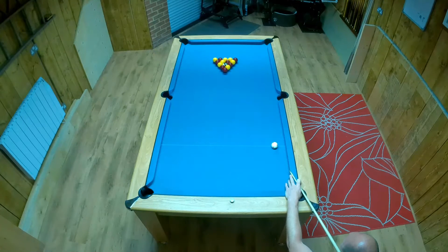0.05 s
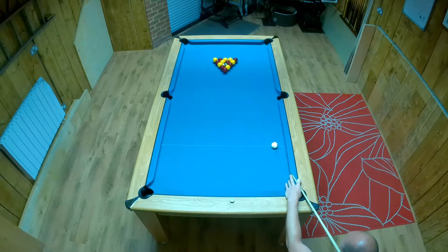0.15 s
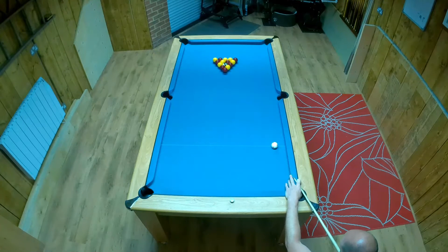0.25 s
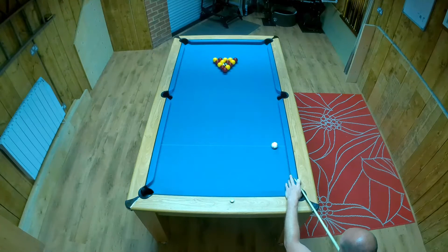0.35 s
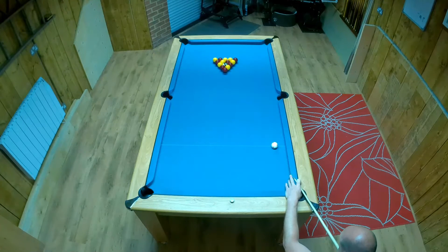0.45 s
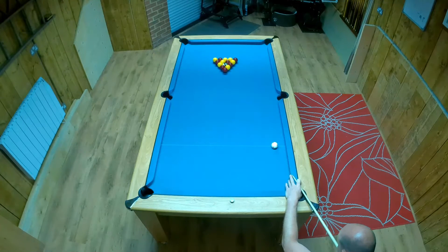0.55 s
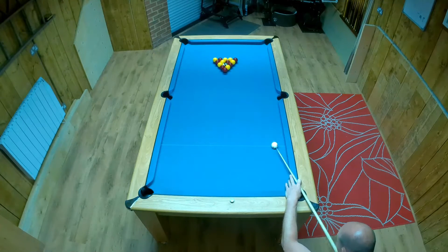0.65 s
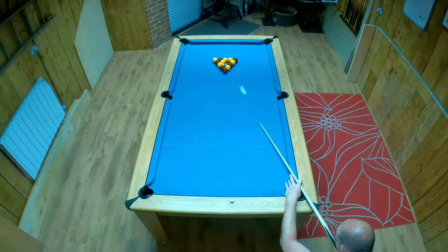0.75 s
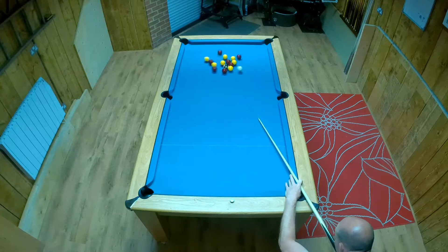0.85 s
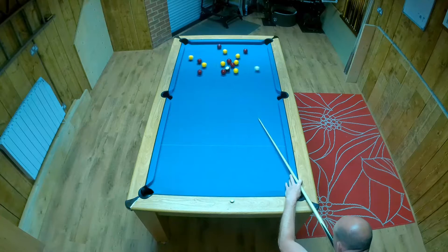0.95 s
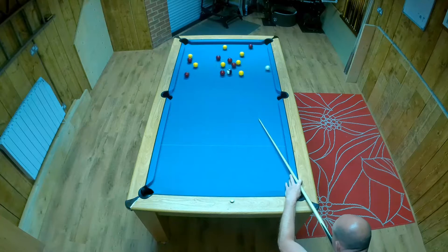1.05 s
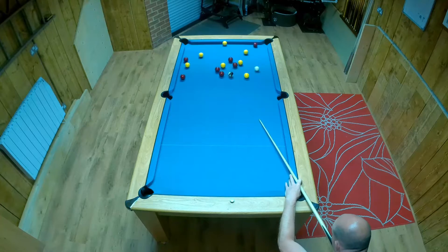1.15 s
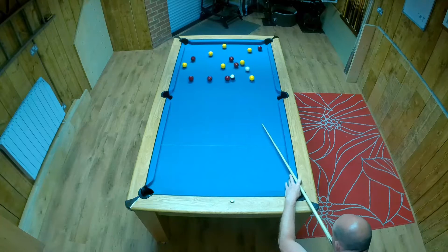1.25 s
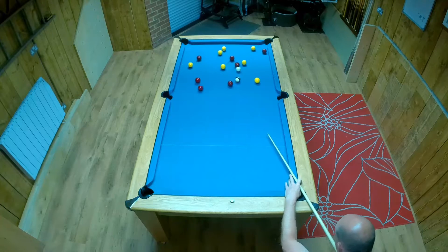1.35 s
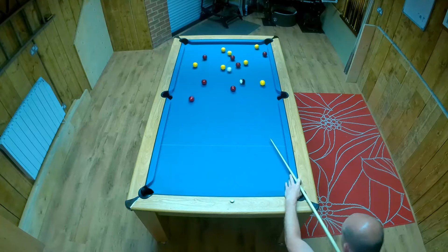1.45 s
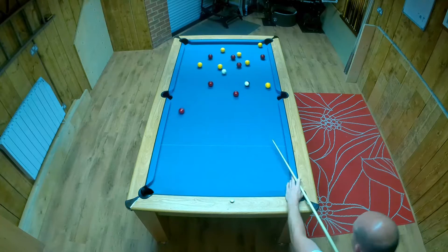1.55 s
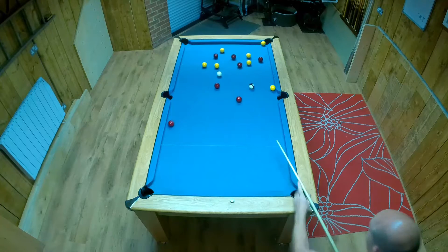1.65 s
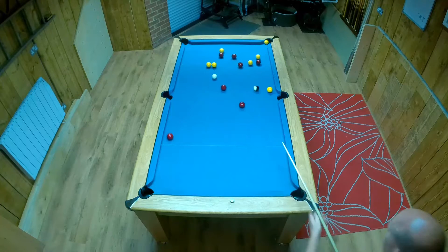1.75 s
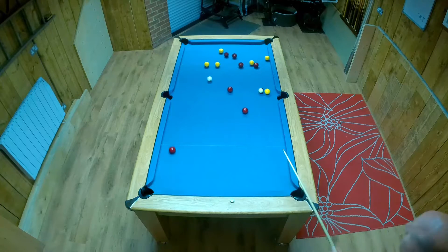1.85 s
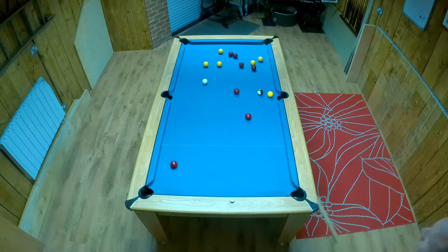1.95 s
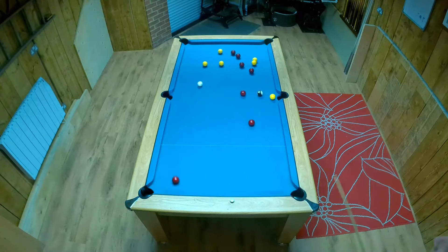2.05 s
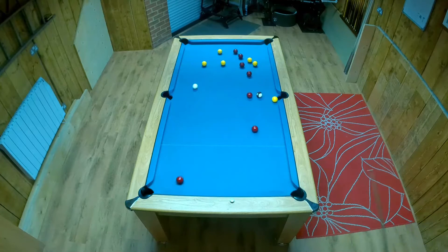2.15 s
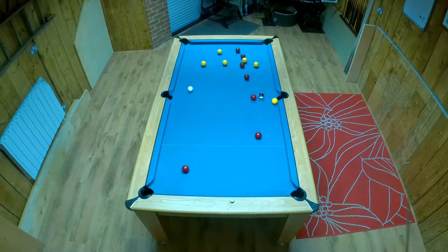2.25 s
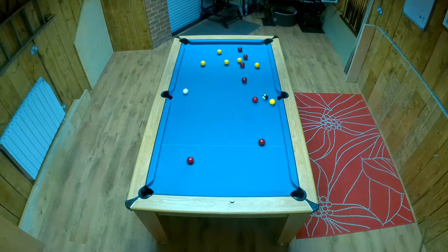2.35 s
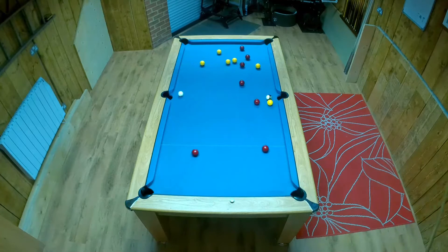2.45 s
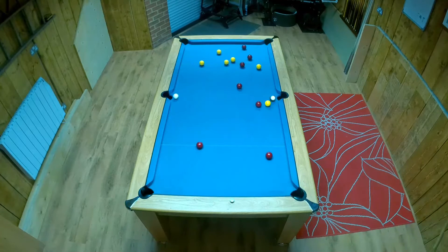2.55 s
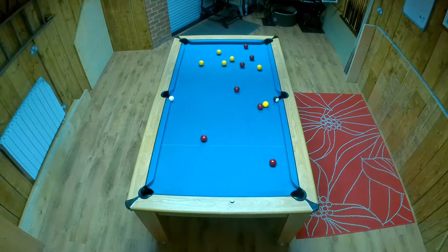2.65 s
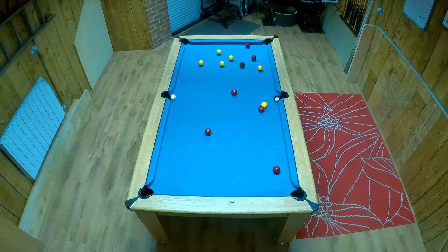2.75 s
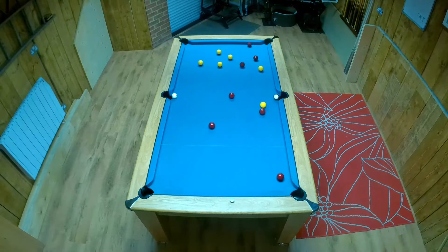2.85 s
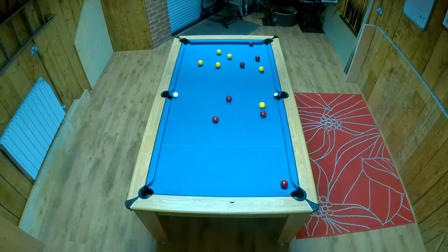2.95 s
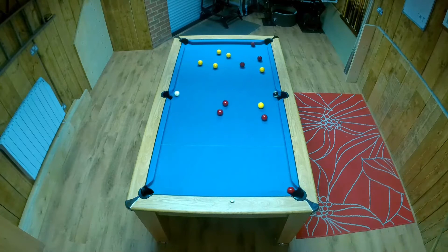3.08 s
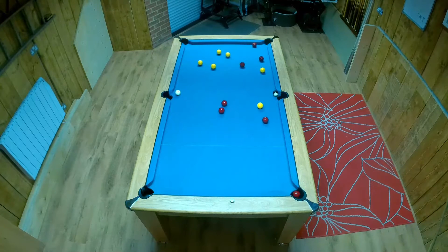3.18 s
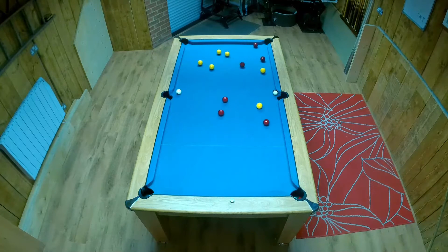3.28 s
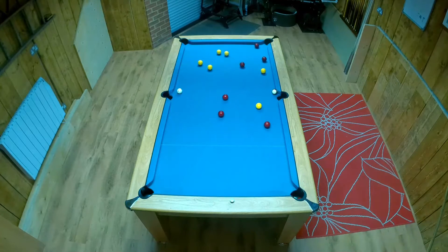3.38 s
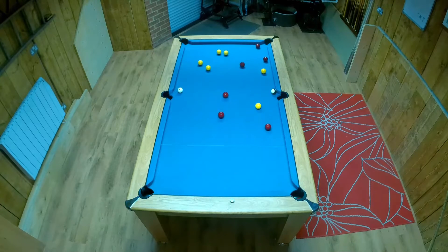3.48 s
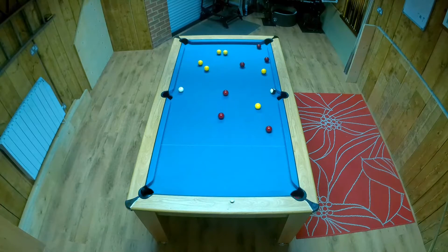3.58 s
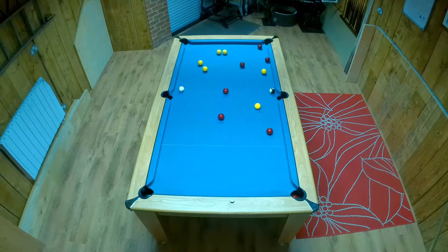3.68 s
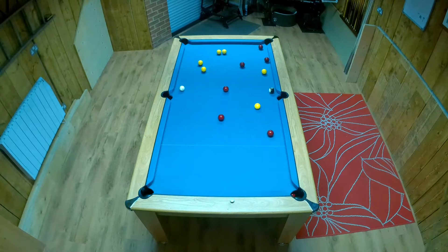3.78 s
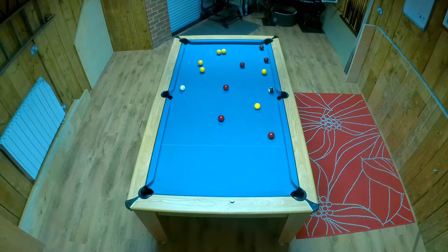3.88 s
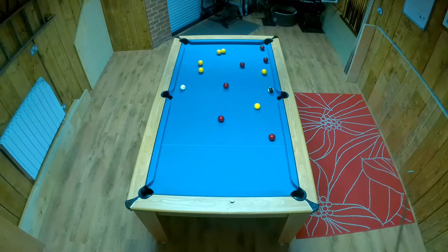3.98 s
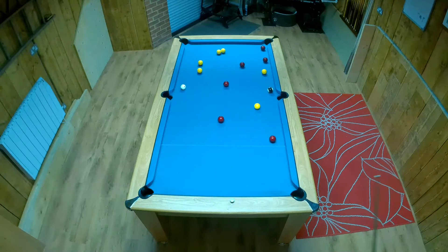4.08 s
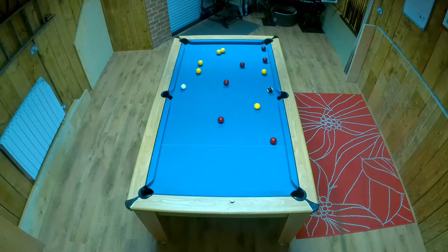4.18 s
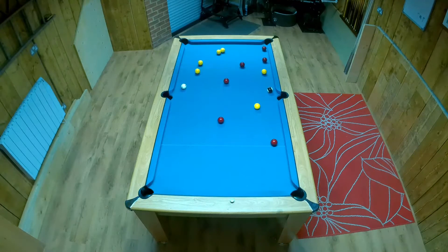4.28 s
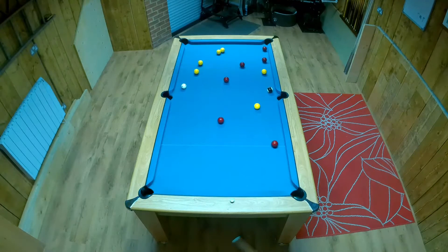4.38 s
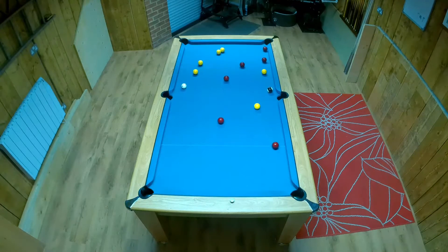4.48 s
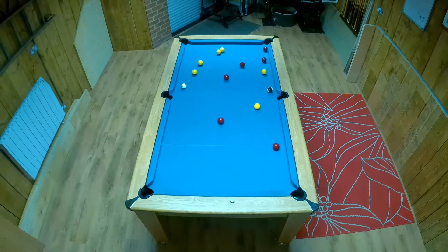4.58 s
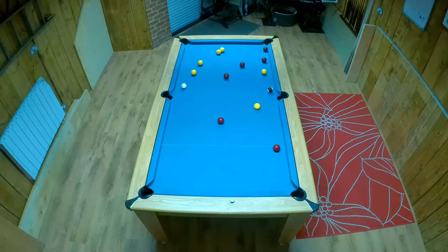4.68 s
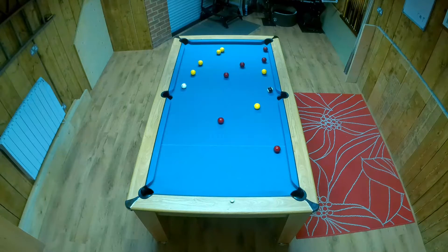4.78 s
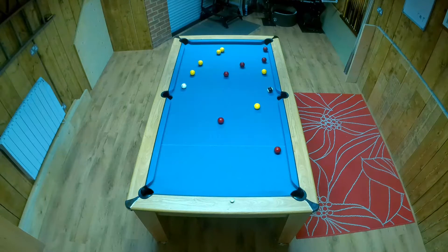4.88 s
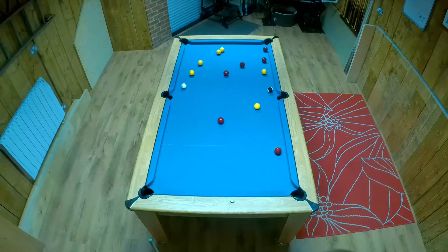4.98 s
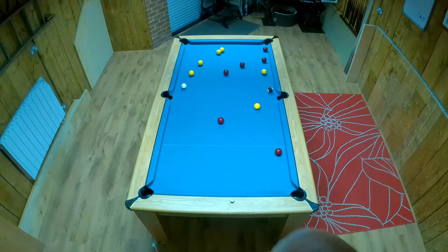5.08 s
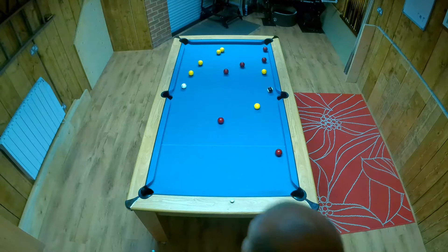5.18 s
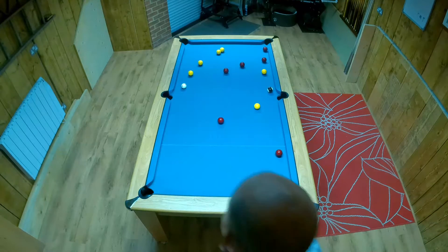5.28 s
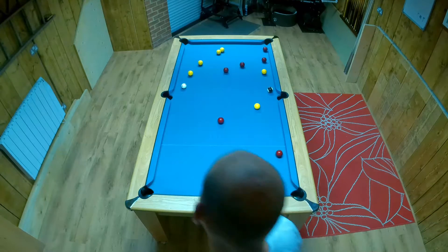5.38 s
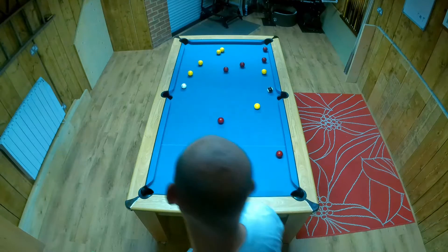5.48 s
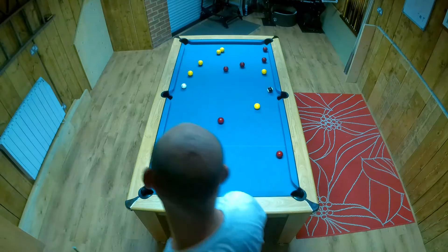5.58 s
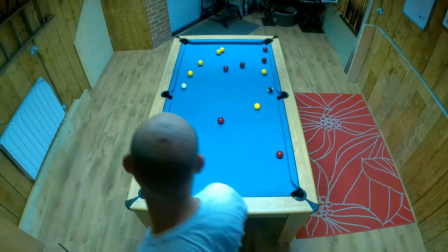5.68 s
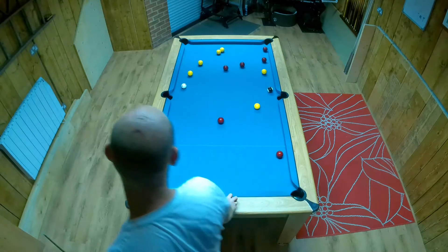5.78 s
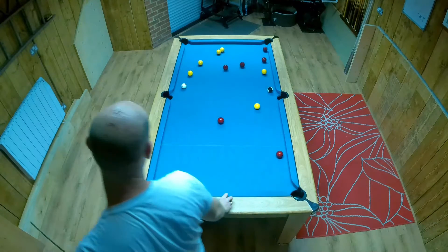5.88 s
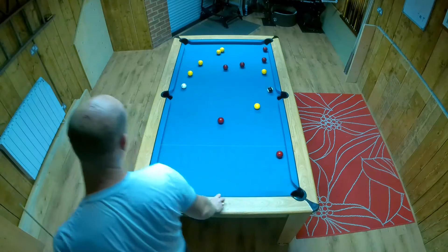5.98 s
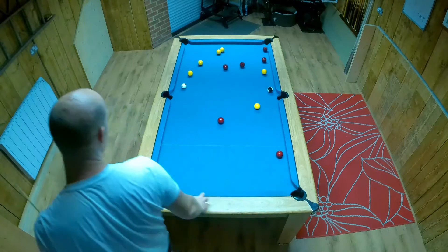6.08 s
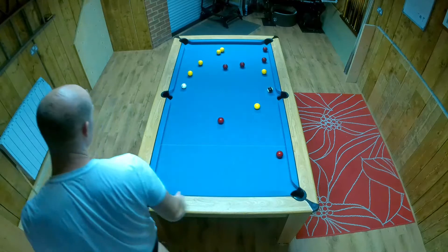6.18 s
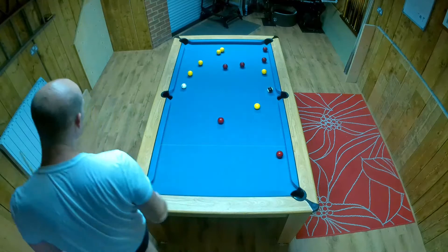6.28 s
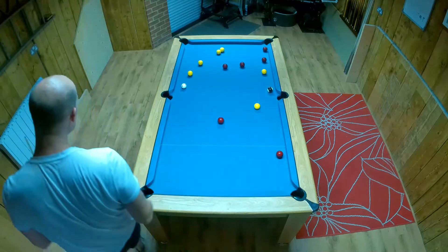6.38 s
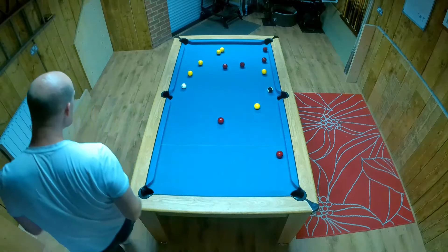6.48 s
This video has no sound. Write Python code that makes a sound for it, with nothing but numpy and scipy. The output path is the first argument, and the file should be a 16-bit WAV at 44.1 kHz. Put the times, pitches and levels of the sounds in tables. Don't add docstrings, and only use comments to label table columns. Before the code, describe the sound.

A cue strike cracks a pool rack apart in a small echoing room, then balls clack, thud on cushions and tumble through the hollow table.

```python
import sys
import numpy as np
from scipy import signal
from scipy.fft import rfft, irfft
from scipy.io import wavfile
from scipy.ndimage import uniform_filter1d, minimum_filter1d

SR = 44100
rng = np.random.default_rng(int(sys.argv[2]) if len(sys.argv) > 2 else 0)


def attenuation_scalar(level_db):
    decades = np.asarray(level_db, float) / 20
    return 10 ** decades


def master(y):
    cut = np.clip(np.atleast_2d(y).T, -1, 1)
    pcm = np.round(cut * 32767)
    wavfile.write(sys.argv[1], SR, pcm.astype(np.int16))


N = 287973

# pitch in Hz, width in Hz (wider dies sooner), level in dB.
WOOD_NOTES = [(95.2, 24, -6.5), (137, 26, 3), (174.5, 28, 0), (220, 5.4, 5.5), (301.6, 28, -7.5),
              (338.6, 26, 3), (470, 150, -3), (523, 35, 6.5), (660, 87, -18), (813, 25, 2.5),
              (880, 26, -1.5), (973, 17, 3.5), (1190, 130, -14), (1365, 43, 0.5), (1700, 220, -11.5),
              (1990, 200, -9.5), (2708, 420, -13.5)]


def evened(x):
    return x / np.sqrt(np.mean(x ** 2) + 1e-20)


def read(points, hz):
    f, value = np.transpose(points)
    return np.interp(np.log(hz + 1), np.log(f + 1), value)


def add(mix, s, sound):
    part = mix[max(round(s * SR), 0):][:len(sound)]
    part += sound[:len(part)]


def coloured(x, points):
    hz = np.fft.rfftfreq(len(x), 1 / SR)
    return irfft(rfft(x) * attenuation_scalar(read(points, hz)), len(x))


def low_pass(order, hz):
    return signal.butter(order, hz, fs=SR, output="sos")


def band_pass(order, hz):
    return signal.butter(order, hz, "bandpass", fs=SR, output="sos")


def ring(x, notes):
    out = np.zeros(len(x))
    for k, (hz, width, db) in enumerate(notes):
        r = np.exp(-np.pi * width / SR)
        poles = [1, -2 * r * np.cos(2 * np.pi * hz / SR), r * r]
        out += (-1) ** k * attenuation_scalar(db) * signal.lfilter([1 - r, 0, r - 1], poles, x)
    return out


def room(x, start_s):
    # pitch in Hz, time to fade by 60 dB in seconds.
    fade_times = [(80, 0.16), (250, 0.34), (700, 0.34), (1500, 0.39), (3000, 0.32), (5000, 0.37),
                  (8000, 0.23), (14000, 0.078)]
    taps = np.zeros(SR)
    at = np.arange(0, SR - 16, 16)
    taps[at + rng.integers(0, 16, len(at))] = rng.choice([-1., 1.], len(at))
    hz, t, z = signal.stft(taps, SR, nperseg=256)
    fade = attenuation_scalar(-60 * t / read(fade_times, hz)[:, None])
    tail = signal.istft(z * fade, SR, nperseg=256)[1]
    tail *= np.clip(np.arange(len(tail)) / SR / start_s, 0, 1) ** 2
    return signal.fftconvolve(x, tail / np.linalg.norm(tail))[:N]


def clacks():
    # time of the wall echo in seconds, peak in dB, hardness (stretches the pitch),
    # direct sound against the echo in dB.
    hits = [(.9215, -6, 1.2, 5), (.9215, -3, 1, -10), (.9223, -2, 1.174, 5), (.926, -12.5, 0.62, 6),
            (.9335, -7, 0.95, -24), (.944, -25, 0.73, -14), (.955, -15, 0.95, -1), (.972, -19, 1.05, -13),
            (.99, -36, 1.3, -6), (1.02, -27, 0.32, 7.5), (1.2925, -23, 0.99, -30), (1.368, -34, 0.88, -15),
            (1.5115, -31, 0.92, -6), (1.5145, -36.5, 0.81, 11.5), (1.599, -30, 0.95, -4),
            (1.8655, -26.5, 0.92, -14.5), (2.049, -33.5, 1.04, -21), (2.18, -40, 0.64, -6),
            (2.332, -30.5, 0.92, -16), (2.600, -28.5, 0.92, -19), (2.801, -45, 0.78, -8.5),
            (3.2645, -22.5, 0.9, -9)]
    # pitch in Hz, level in dB.
    click_colour = [(300, -32), (600, -18), (1000, -3.5), (1600, -1), (2000, -5.5), (2800, -1.5),
                    (3400, -11), (4300, -23), (6400, -45.5), (16000, -78.5)]
    # delay in seconds, level in dB.
    walls = [(.0070, 0), (.0031, -13), (.0059, -8), (.0087, -2), (.0102, -3), (.0077, -5), (.0165, -14),
             (.0195, -13), (.023, -15), (.028, -14)]
    bounced, sent = np.zeros((3, N)), np.zeros(N)
    hz = np.fft.rfftfreq(512, 1 / SR)
    for k, (s, db, hardness, direct_db) in enumerate(hits):
        spectrum = 1j * attenuation_scalar(read(click_colour, hz / hardness))
        click = np.roll(irfft(spectrum), 128)[:256] * np.hanning(128).repeat(2)
        click *= attenuation_scalar(db + 3) / np.abs(click).max()
        start = s - walls[0][0] - 128 / SR
        add(bounced[k % 3], start, click)
        add(sent, start, attenuation_scalar(direct_db) * click)
    for lag, db in walls:
        add(sent, lag, attenuation_scalar(db) * rng.choice([-1, 1]) * bounced.sum(0))
    return sent + attenuation_scalar(1) * sum(room(part, .012) for part in bounced)


def blows():
    # start in seconds, knock in dB, boom in dB, rattle in dB,
    # hardness (raises the pitch). Sharp blows of the cue.
    strikes = [
        (0.776, -12, -14, -19.5, 1.126),
        (0.912, -21, -45, -25.5, 2.2),
    ]
    drops = [(1.352, -57, -63, -60, 1.4), (1.947, -15.5, -42, -24.5, 0.78), (1.973, -25.5, -25.5, -51, 2.4),
             (2.221, -41, -42, -50, 1), (2.411, -28, -38, -37, 0.98), (3.355, -14.5, -18.5, -25, 0.73),
             (3.379, -23, -24, -33, 0.63), (4.136, -32.5, -43, -45, 0.96), (4.155, -31.5, -39.5, -44, 1.1),
             (4.199, -34, -48, -53, 1.21), (4.259, -49, -54, -58.5, 1.4), (5.059, -26, -28, -50.5, 0.89),
             (5.099, -29.5, -37, -50, 0.97), (5.786, -48.5, -48.5, -55.5, 1.6)]
    tumbles = [(0.858, -20, -32.5, -54, 0.89), (1.064, -25, -39, -50, 0.86),
               (3.424, -21, -25.5, -47.5, 0.88), (3.47, -22.5, -24, -58, 0.7),
               (3.514, -16.5, -23.5, -40, 0.72), (4.946, -23, -23, -62, 0.64),
               (5.067, -25.5, -25.5, -35.5, 0.81), (5.347, -19, -28.5, -38, 0.9),
               (5.633, -37, -32, -60.5, 0.68), (6.025, -49.5, -55.5, -64, 1)]
    # start in seconds, knock in dB, boom in dB, hardness.
    thuds = [(1.024, -21, -18.5, 1), (1.144, -20, -24.5, 0.87), (1.169, -29, -31.5, 0.9),
             (1.229, -53.5, -46, 1), (1.288, -55, -40.5, 0.37), (2.768, -54, -37, 0.21),
             (2.897, -53, -57, 0.98), (3.125, -30.5, -34.5, 0.6), (3.182, -15.5, -19, 0.81),
             (3.198, -23, -23.5, 0.54), (3.878, -60, -51.5, 0.65), (3.917, -43, -38, 0.73),
             (3.97, -29.5, -30, 0.76)]
    # knock in dB, boom in dB, rattle in dB, hardness.
    snap = (-34, -35.5, -13.5, 1.75)
    hard_top_hz, soft_top_hz = 18000, 2600
    rows = [(.9213, *snap[:3], .001, snap[3], hard_top_hz)]
    for table, length, top_hz in [(strikes, .004, hard_top_hz), (drops, .013, hard_top_hz),
                                  (tumbles, .019, soft_top_hz)]:
        rows += [(*r[:4], length, r[4], top_hz) for r in table]
    rows += [(*r[:3], r[1] - 42, .011, r[3], soft_top_hz) for r in thuds]
    return sorted(rows)


def ringing_parts():
    # start in seconds, pitch in Hz, level in dB, rise in seconds, time to fade by 60 dB in seconds.
    rings = [(.775, 968, -6.5, 0.0018, 0.021), (.7845, 995, -37, 0.0062, 0.13),
             (0.779, 1230, -23, 0.0007, 0.086), (1.03, 149.3, -26, 0.0083, 0.28),
             (1.227, 137, -23.5, 0.015, 0.24), (1.355, 138.4, -25, 0.0057, 0.08),
             (1.95, 953, -21, 0.002, 0.16), (1.961, 1005, -27, 0.0045, 0.078),
             (1.955, 880, -27, 0.0048, 0.08), (2.225, 110.5, -36, 0.014, 0.41),
             (3.36, 926, -5, 0.0017, 0.019), (3.518, 220, -12, 0.004, 0.052),
             (3.915, 168.5, -35, 0.0035, 0.35), (4.146, 84.1, -31, 0.007, 0.21),
             (4.505, 73.1, -38, .015, 0.39), (5.634, 231.4, -27.5, 0.0022, 0.15)]
    out = np.zeros(N)
    t = np.arange(SR // 2) / SR
    for s, hz, db, rise, t60 in rings:
        swell = np.sin(np.minimum(t / rise, 1) * np.pi / 2) ** 2
        add(out, s, attenuation_scalar(db - 60 * t / t60) * swell * np.sin(2 * np.pi * hz * t))
    return out


def knocks():
    # pitch in Hz, level in dB.
    rattle_colour = [(900, -23), (1700, 5), (3000, -3), (4500, -4.5), (7000, -13), (10500, -22.5),
                     (12500, -33), (16000, -39.5)]
    wood, loose = np.zeros((3, N)), np.zeros(N)
    t = np.arange(4096) / SR
    boom_band = band_pass(3, [110, 330])
    for k, (s, knock_db, boom_db, rattle_db, length, hardness, top_hz) in enumerate(blows()):
        knock_push, boom_push, rattle_push = rng.standard_normal((3, len(t)))
        u = t / length
        blow = np.minimum(t * hardness ** 2 / 0.0012, 1) * np.exp(-u) / np.sqrt(length / 0.0086)
        centre_hz = np.clip(700 * hardness, 200, 3000)
        band = band_pass(2, [centre_hz / 1.515, centre_hz * 1.65])
        band = np.vstack([band, low_pass(1, centre_hz * 4)])
        knock = signal.sosfilt(band, blow * knock_push) / np.sqrt(hardness)
        boom = signal.sosfilt(boom_band, np.minimum(t / 0.01, 1) * np.exp(-u / 0.91) * boom_push)
        rattle = signal.sosfilt(low_pass(2, top_hz), blow * np.exp(-u * 0.29) * rattle_push)
        add(wood[k % 3], s, attenuation_scalar(knock_db + 7.5) * knock)
        add(wood[k % 3], s, attenuation_scalar(boom_db + 19.5) * boom)
        add(loose, s, attenuation_scalar(rattle_db + 1.5) * rattle)
    wood = [part + attenuation_scalar(8) * ring(part, WOOD_NOTES) for part in wood]
    wood[0] += ringing_parts()
    loose = coloured(loose, rattle_colour)
    wood_echo = attenuation_scalar(-4.5) * sum(room(part, 0.011) for part in wood)
    return sum(wood) + loose + wood_echo + attenuation_scalar(-1.5) * room(loose, 0.002)


def scuffs():
    # start in seconds, peak in dB, middle pitch in Hz, length in seconds.
    rubs = [(2.143, -50.5, 7050, 0.044), (5.5894, -81, 4480, 0.039), (5.8194, -54.5, 5590, 0.046),
            (6.1636, -47.5, 5430, 0.021), (6.288, -70.5, 4200, 0.025)]
    out = np.zeros(N)
    t = np.arange(6000) / SR
    for s, db, hz, length in rubs:
        noise = rng.standard_normal(len(t))
        grain = evened(ring(noise, [(hz, 700, 0), (hz * 0.92, 2500, -6)]))
        add(out, s, attenuation_scalar(db - 12) * grain * np.minimum(t / 0.0025, 1) * np.exp(-t / length))
    return out


def surging(t):
    # peak time in seconds, rumble in dB, rolling in dB, rise in dB per second, fade in dB per second.
    surges = [(.96, -34, -27.5, 225.5, 168.5), (1.22, -41.5, -69.5, 60.5, 60.5),
              (1.9, -44, -53, 65.5, 40.5), (3.221, -49, -51, 69.5, 35), (3.42, -35.5, -34, 118, 109.5),
              (4.11, -55.5, -63, 79, 41.5), (4.5, -69, -69, 44, 27.5), (5.29, -50, -48, 31, 49.5),
              (6.3, -50.5, -54.5, 8, 8)]
    rumble = attenuation_scalar(-53) ** 2
    rolling = (t > .9) * attenuation_scalar(-64.5) ** 2
    for s, rumble_db, rolling_db, rise, fade in surges:
        under_db = -np.maximum(rise * (s - t), fade * (t - s))
        rumble = rumble + attenuation_scalar(rumble_db + under_db) ** 2
        rolling = rolling + attenuation_scalar(rolling_db + under_db) ** 2
    return np.sqrt(rumble), np.sqrt(rolling)


def background():
    # pitch in Hz, level in dB per Hz.
    room_colour = [(15, -29.5), (25, -7), (48, -18), (86, 1), (138, -17.5), (165, -11), (250, -24),
                   (500, -31), (1000, -31), (2500, -43), (5000, -41), (7500, -49), (10300, -47.5),
                   (16000, -50.5)]
    hiss, low, roll, lumps = rng.standard_normal((4, N))
    lumps = evened(uniform_filter1d(uniform_filter1d(lumps, 1800), 1800))
    rumble = evened(ring(low, [(77.7, 23.8, 3.5), (94, 71.6, -1.5), (155, 51.6, -2)])) * attenuation_scalar(2.8 * lumps)
    rolling = coloured(roll, [(120, -24), (250, 10), (600, 1), (1200, -6.5), (2500, -40.5)])
    rolling = evened(rolling + attenuation_scalar(2.5) * ring(roll, WOOD_NOTES[3:12]))
    rumble_gain, rolling_gain = surging(np.arange(N) / SR)
    return (attenuation_scalar(-52.5) * evened(coloured(hiss, room_colour))
            + attenuation_scalar(-0.5) * rumble_gain * rumble
            + attenuation_scalar(-3.5) * rolling_gain * rolling)


def scene():
    return (clacks() + knocks() + scuffs() + background())[None]


def treble_gaps(x):
    # middle of the gap in seconds, pitch in Hz above which all is lost.
    gaps = [(.044, 2400), (1.255, 3000), (1.602, 4500), (1.813, 2400), (1.998, 8000), (2.184, 3200),
            (2.647, 3800), (2.879, 2800), (3.441, 2400), (3.449, 2400), (3.458, 2400), (3.900, 2200),
            (4.156, 2400), (5.573, 1600), (6.223, 2200), (6.269, 2000), (6.478, 2600)]
    out = x.copy()
    window = signal.windows.kaiser_bessel_derived(2048, 4 * np.pi) ** 12
    for s, hz in gaps:
        at = round(s * SR) - 1024
        part = out[at:at + len(window)]
        treble = signal.sosfiltfilt(signal.butter(8, hz, "highpass", fs=SR, output="sos"), part)
        add(out, at / SR, -window * treble)
    return out


def roll_off(x):
    return signal.sosfilt(signal.butter(12, 16190, fs=SR, output="sos"), x)


def record(dry):
    room_left = .9 / np.maximum(np.abs(dry[0]), .9)
    ridden = dry[0] * uniform_filter1d(minimum_filter1d(room_left, 88), 44)
    impulse = np.eye(64)[0]
    tick = signal.sosfilt(band_pass(1, [5000, 8500]), impulse)
    add(ridden, .922, attenuation_scalar(-10) * tick)
    return roll_off(treble_gaps(ridden)[None] - .0019)


dry = scene()
out = record(dry)
master(out)
```